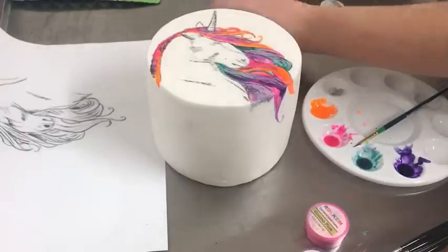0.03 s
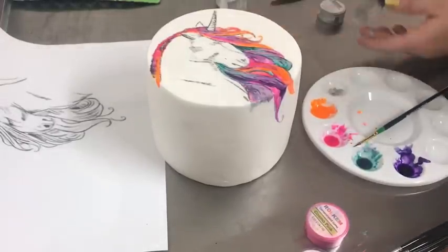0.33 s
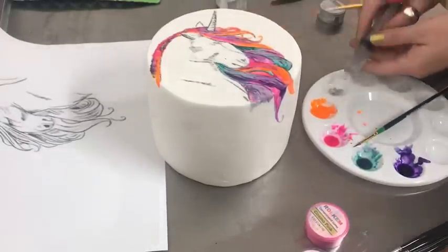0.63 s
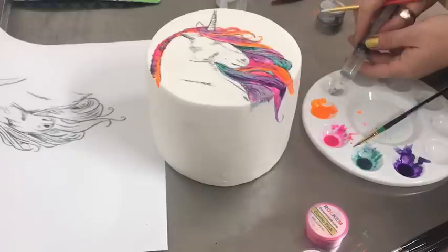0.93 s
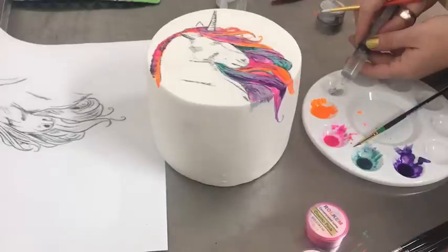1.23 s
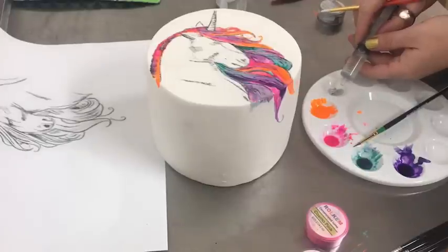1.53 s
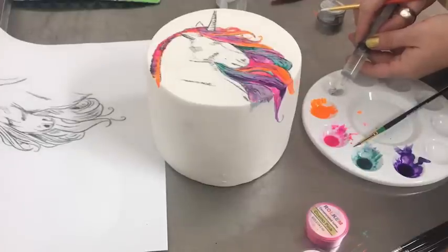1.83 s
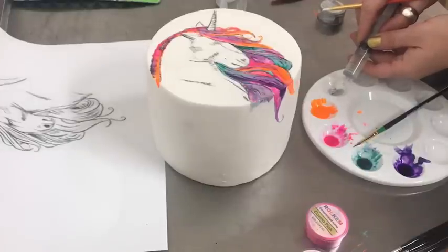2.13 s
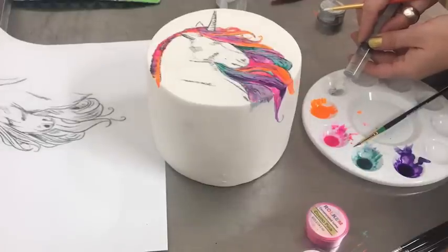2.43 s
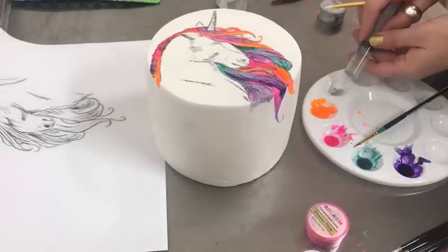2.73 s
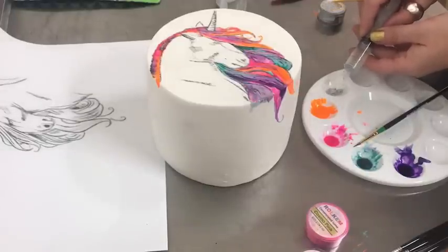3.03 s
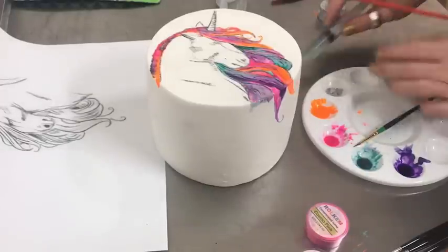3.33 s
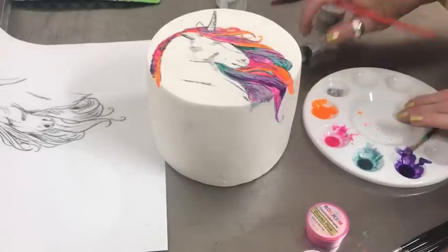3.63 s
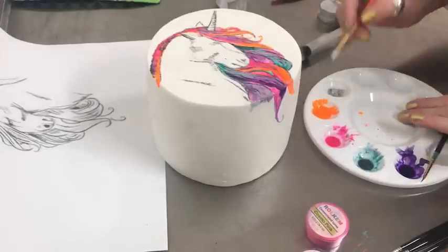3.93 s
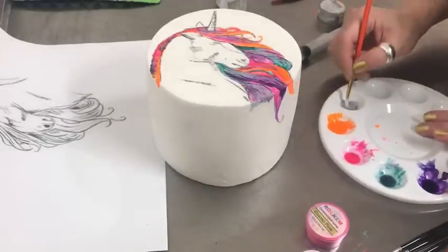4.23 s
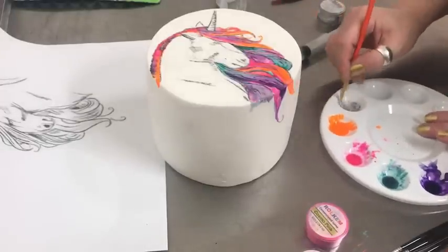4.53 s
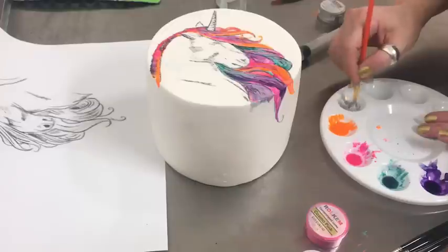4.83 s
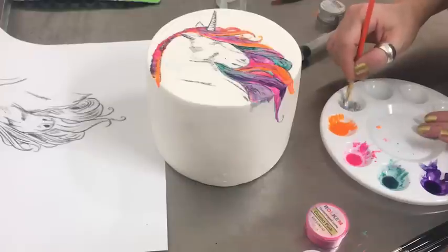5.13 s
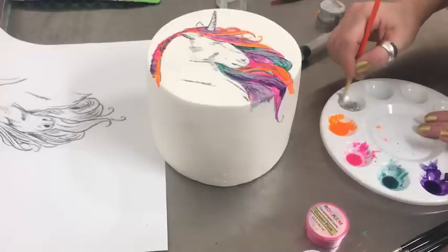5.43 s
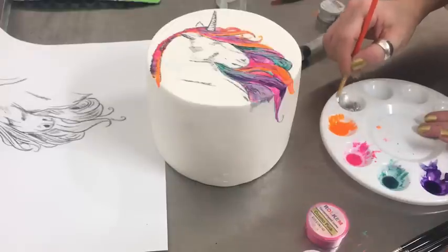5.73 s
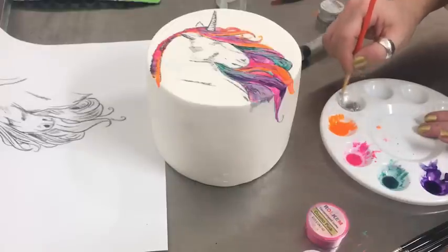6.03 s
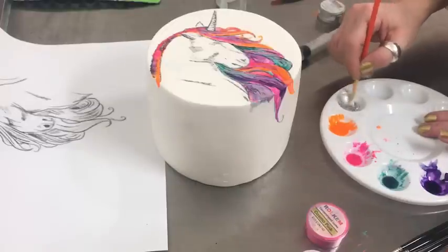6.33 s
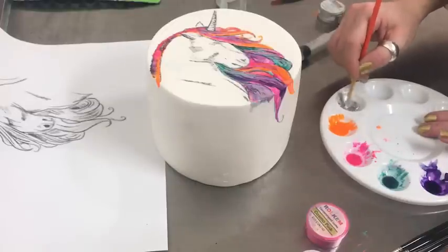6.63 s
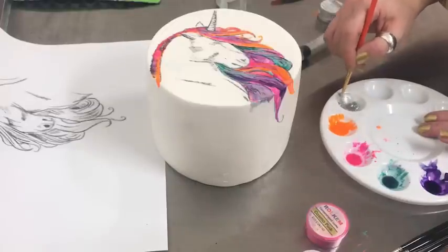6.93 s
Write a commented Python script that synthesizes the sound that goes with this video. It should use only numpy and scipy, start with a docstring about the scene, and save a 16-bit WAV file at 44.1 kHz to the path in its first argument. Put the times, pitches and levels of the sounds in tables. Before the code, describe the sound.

Things knock on a table, then a paintbrush clatters on a plastic palette and softly stirs and taps in a quiet room.

```python
"""Painter at a table

Close up in a small quiet room, things knock down on a table and a brush handle clatters on a plastic
palette. The palette slides, a sleeve swishes, and the brush stirs and taps in one of the wells.
Blows ring each object's resonances; rubbing is a stream of tiny slips. Behind it all, a wall clock
ticks faintly over the room tone and a thin electronic buzz."""
import sys
import numpy as np
from scipy import signal
from scipy.fft import rfft, irfft
from scipy.io import wavfile
from scipy.ndimage import uniform_filter1d

SR = 44100
rng = np.random.default_rng(int(sys.argv[2]) if len(sys.argv) > 2 else 0)


def persist_wave(psi):
    """Save psi, clipped to +-1, as 16-bit WAV."""
    counts = np.round(np.clip(psi, -1, 1) * 32767).astype(np.int16)
    wavfile.write(sys.argv[1], SR, np.atleast_2d(counts).T)


N = 308347
RING_SAMPLES = 32768  # buffer for one hit or one room response

# things landing on the table: (t/s, level/dB, thud/dB, crack/dB, favoured resonance/Hz)
KNOCK_HITS = [(0.001, -27, 11.5, 11.5, 844), (0.0102, -35, 21, 0, 920), (0.1305, -34.5, 11.5, 10, 403),
              (0.157, -34, 5.5, 14.5, 1790), (0.1688, -31.5, 12.5, -1, 298), (1.64, -72, 8, -17, 706),
              (1.755, -66, 13, -24, 1500), (3.512, -29, 0.5, 3, 1730), (3.5205, -34, 2, -16, 1050),
              (3.578, -39, -24.5, -10, 2070), (3.628, -28.5, 0.5, 1.5, 2150), (3.635, -34, 7, -5.5, 1350),
              (3.778, -44.5, -2, -11, 1500), (3.812, -47.5, 0, -11, 346)]
# the table's broad tone (f/Hz, gain/dB) and its modes (f/Hz, width/Hz, boost/dB)
TABLE_COLOUR = [(35, -19.5), (65, -5.5), (120, -5.5), (155, -6.5), (200, -2.5), (350, -2.5), (700, -2.5),
                (1100, -1), (1700, -1.5), (2400, -5.5), (4200, -8), (5200, -14.5), (8000, -20),
                (10500, -23.5), (13500, -23.5), (16000, -32.5)]
TABLE_MODES = [(192, 14, 8), (233, 14, 11), (356, 32, 11), (609, 18, 10), (838, 25, 7), (1096, 24, 8),
               (1249, 16, 8), (1384, 22, 5), (1496, 25, 7), (1662, 26, 8), (1826, 16, 10), (2042, 18, 8),
               (2171, 25, 7), (2535, 16, 7), (2673, 28, 7), (2960, 35, 6), (3400, 60, 4), (4145, 30, 6)]


def table_knocks():
    """Things are set down and ring the table top: low, roomy knocks."""
    return blows(KNOCK_HITS, TABLE_COLOUR, TABLE_MODES, contact_s=0.003, room_db=5,
                 thud_hz=110.2, thud_octaves=2.3, crack_hz=4750, spot_db=9.5, spot_width=0.072)


# the handle's hits and bounces: (t/s, level/dB, thud/dB, crack/dB, favoured resonance/Hz)
HANDLE_HITS = [(3.5805, -38.5, 9, -2, 2080), (3.5825, -36, 11, 7, 2040), (3.7693, -30, -8, -2, 3174),
               (3.7942, -51.5, 0.5, 15, 8170), (3.814, -49.5, 4.5, 2.5, 1480), (3.8232, -45, 0, -8, 2270),
               (3.8375, -48, 15, -11, 3230)]
# the handle's broad tone (f/Hz, gain/dB) and its modes (f/Hz, width/Hz, boost/dB)
HANDLE_COLOUR = [(60, -26), (350, -18.5), (750, -26), (1400, -0.5), (1800, -13.5), (2700, -10.5),
                 (3100, -7), (3700, -1), (4400, -9), (5100, -21), (5900, -6), (7000, -13), (8300, -14),
                 (15000, -24)]
HANDLE_MODES = [(1530, 55, 6.2), (2166, 117, 21), (2253, 52, 5.1), (3090, 100, 1.87), (3670, 160, 1.78),
                (5700, 400, 5.6), (14200, 500, 6)]


def handle_clatter():
    """A brush handle bounces on the palette: short contacts, bright clicks."""
    return blows(HANDLE_HITS, HANDLE_COLOUR, HANDLE_MODES, contact_s=0.00109, room_db=-5,
                 thud_hz=353, thud_octaves=1.3, crack_hz=5930, spot_db=14, spot_width=0.15)


# taps in a well, the last row the palette rocking on the table after the final tap: (t/s, level/dB, thud/dB,
# crack/dB, favoured resonance/Hz)
TAP_HITS = [(3.973, -61, -3, -20, 3100), (4.333, -53.5, 0, -19, 1500), (4.572, -70.5, -3, -10, 3200),
            (4.659, -60.5, -11, 0, 3100), (5.2727, -51.5, 13.5, 6.5, 2520), (5.479, -73.5, 5, 1, 3030),
            (6.261, -62, 22, 0, 3900), (6.6095, -56, 11, -1, 3080), (6.9275, -44, 3.5, 0, 3030),
            (6.934, -44.5, 6, -37, 1480)]
# the palette's broad tone (f/Hz, gain/dB) and its modes (f/Hz, width/Hz, boost/dB)
PALETTE_COLOUR = [(50, -3), (180, 5), (300, -4), (700, -14), (1400, -8), (2200, 2.5), (2600, -1),
                  (3100, 1.5), (4300, 0.5), (5000, -12.5), (5900, -12.5), (8000, -12), (10500, -18),
                  (16000, -25)]
PALETTE_MODES = [(1286, 35, 15.4), (1500, 39, 18.3), (2300, 72, 3.8), (2970, 83, 3.5), (3940, 120, 5.8),
                 (4200, 110, 2.3), (5750, 280, 13.4)]


def brush_taps():
    """The brush taps the wall of a well and lightly rings the plastic."""
    return blows(TAP_HITS, PALETTE_COLOUR, PALETTE_MODES, contact_s=0.00173, room_db=-3,
                 thud_hz=202, thud_octaves=1.3, crack_hz=2780, spot_db=5.5, spot_width=0.062)


def blows(hits, colour, modes, contact_s, room_db, thud_hz, thud_octaves, crack_hz, spot_db, spot_width):
    """Each blow rings the object; a heavy one adds low thud, a hard one adds high crack."""
    out = np.zeros(N + RING_SAMPLES)
    t, hz = np.arange(RING_SAMPLES) / SR, bins(RING_SAMPLES)
    thud_band = np.exp(-(np.log2(hz / thud_hz) / thud_octaves) ** 2)
    crack_shelf = 1 / (1 + (crack_hz / hz) ** 4)
    for at_s, db, thud_db, crack_db, spot_hz in hits:
        force = undb(thud_db * thud_band + crack_db * crack_shelf)
        # the struck spot favours one resonance
        gain = body(colour, [*modes, (spot_hz, spot_width * spot_hz, spot_db)], hz)
        # the surfaces chatter while they touch, smearing the attack
        chatter = rfft(rng.standard_normal(RING_SAMPLES) * np.exp(-(t / contact_s) ** 4))
        chatter /= np.abs(chatter)
        hit = irfft(ring(gain * force) * chatter * room(room_db))[:RING_SAMPLES // 2]
        rms = np.sqrt(np.sum(hit ** 2) / (0.02 * SR))  # as if its energy were spread over 20 ms
        start = int(at_s * SR)
        out[start:start + len(hit)] += undb(db) * hit / rms
    return out[:N]


# a nudge, then the slide: (peak t/s, level/dB, rise/s, fall/s), and their tone (f/Hz, gain/dB)
SLIDE_STROKES = [(3.94, -66.5, .09, 0.032), (4.2, -54, 0.16, 0.16)]
SLIDE_COLOUR = [(200, -17), (360, -3.5), (520, -17), (850, -14), (1150, -3.5), (2150, -2.5), (2650, -9),
                (3150, -2), (4200, -9), (5200, -19), (6100, -16), (10400, -25), (13000, -18),
                (16000, -21.5)]


def palette_slide(hiss_hz=4800):
    """The palette scrapes along the table: it grumbles when slow and gains hiss with speed."""
    scrape = coloured(grains(per_s=9000, uneven_db=1.1, room_db=3), SLIDE_COLOUR)
    hiss = signal.sosfiltfilt(signal.butter(2, hiss_hz, "high", fs=SR, output="sos"), scrape)
    speed = swells(SLIDE_STROKES)
    dullness = 1 - np.sqrt(speed / speed.max())
    return (scrape - dullness * hiss) * speed


# passes of the arm: (peak t/s, level/dB, rise/s, fall/s), and their tone (f/Hz, gain/dB)
SWISH_STROKES = [(0.2, -52, .02, 0.039), (0.37, -64, 0.14, 0.074), (0.7, -71.5, 0.5, 0.23),
                 (3.24, -76, .1, .1), (3.41, -60, 0.08, 0.091)]
SWISH_COLOUR = [(300, -23), (700, -6), (1250, 2), (1800, -2), (4000, -6), (7000, -7.5), (10400, -11),
                (13000, -10), (16000, -15)]


def sleeve_swish():
    """Hand and sleeve brush the table: slips so dense that they blur into a swish."""
    slips = grains(per_s=14000, uneven_db=0.7, room_db=3)
    return coloured(slips, SWISH_COLOUR) * swells(SWISH_STROKES)


# the ring after the knocks, and faint later swells: (peak t/s, level/dB, rise/s, fall/s)
RING_ON_SWELLS = [(0.37, -59, 0.18, 0.19), (3.87, -60, .04, 0.16), (4.14, -70, .06, 0.064),
                  (4.37, -66.5, .03, 0.024), (4.82, -69, 0.32, 0.1)]
# that ring's broad tone (f/Hz, gain/dB) and its modes (f/Hz, width/Hz, boost or cut/dB)
RING_ON_COLOUR = [(100, -5.5), (250, -9.5), (550, -6.5), (900, -7.5), (1600, -6), (3000, -13),
                  (8000, -34.5)]
RING_ON_MODES = [(235, 23, -1), (370, 31, 7.5), (588, 74, 11), (1260, 40, -3), (1825, 66, -13)]


def table_ring_on():
    """The table top and room ring on after the knocks, with a few faint low swells later."""
    wash = grains(per_s=2500, uneven_db=1.8, room_db=2)
    return coloured(wash, RING_ON_COLOUR, RING_ON_MODES) * swells(RING_ON_SWELLS)


# a light tick of the brush: (peak t/s, level/dB, rise/s, fall/s), and its tone (f/Hz, gain/dB)
SCUFF_STROKES = [(3.247, -68, .012, .018)]
SCUFF_COLOUR = [(3000, -26), (6000, -10), (6900, 6), (7600, -8), (8400, 2), (10500, -13), (13000, -12),
                (16000, -17)]


def brush_scuff():
    """The brush gives one light tick: a dry, high scuff."""
    slips = grains(per_s=8000, uneven_db=1.2, room_db=0)
    return coloured(slips, SCUFF_COLOUR) * swells(SCUFF_STROKES)


# spells of stirring: (peak t/s, level/dB, rise/s, fall/s), and the bristles' tone (f/Hz, gain/dB)
STIR_STROKES = [(4.53, -73.5, .08, 0.26), (5.97, -73, 0.61, 0.46)]
STIR_COLOUR = [(300, -10), (700, -11), (1100, -2), (1450, 3.5), (1900, -5.5), (3100, -2.5), (4200, -7),
               (5200, -9), (7000, -9.5), (10500, -14), (15000, -12)]


def brush_stir(turns_per_s=5.3, swing_db=0.5):
    """Bristles circle in a well with a soft rustle, pressing harder once each turn."""
    t = np.arange(N) / SR
    pressure = undb(-swing_db * np.sin(2 * np.pi * turns_per_s * t + wander(2.9)))
    rustle = coloured(grains(per_s=3000, uneven_db=2, room_db=0), STIR_COLOUR)
    return rustle * pressure * swells(STIR_STROKES)


# the hand's weight on the table: (peak t/s, level/dB, rise/s, fall/s)
LEAN_SWELLS = [(4.65, -67, .25, .3), (6.35, -62.5, 0.4, 0.46)]


def table_rumble():
    """The working hand faintly shakes the table: swells of low noise."""
    # (f/Hz, gain/dB)
    colour = [(40, -23), (70, -4), (100, 3), (135, -7.5), (190, 0), (300, -17.5), (1000, -42)]
    return coloured(rng.standard_normal(N), colour) * swells(LEAN_SWELLS)


def grains(per_s, uneven_db, room_db):
    """Dense tiny impulses of unequal size and wavering level, smeared by the room."""
    impulses = (rng.random(N) < per_s / SR) * rng.standard_normal(N)
    waver = undb(uneven_db * wander(45))
    return signal.fftconvolve(impulses * waver, irfft(room(room_db)))[:N]


def swells(rows, roundness=1.88):
    """Envelope of swells that rise to a peak and ease off; roundness 1 is pointed, 2 a bell."""
    t, gain = np.arange(N) / SR, 0
    for peak_s, db, rise_s, fall_s in rows:
        away = np.abs(t - peak_s) / np.where(t < peak_s, rise_s, fall_s)
        gain = gain + undb(db) * np.exp(-away ** roundness)
    return gain


# the gears' broad tone (f/Hz, gain/dB) and their modes (f/Hz, width/Hz, boost or cut/dB)
GEAR_COLOUR = [(300, -8), (650, -7.5), (1100, 6.5), (1700, -1), (3300, 1), (4800, -10), (6200, -11.5),
               (12000, -23)]
GEAR_MODES = [(1027, 36, 12.5), (2070, 60, -4), (2470, 65, 5), (3420, 140, 0), (6160, 270, 9)]


def wall_clock(first_s=0.099, every_s=1, rise_s=0.031, fall_s=0.029, tail_s=0.19, tail_db=-12,
               gears_db=-66, quiver_db=-72.5, quiver_db_per_s=-0.5, quivers_per_s=15.6, quiver_s=0.19):
    """A far clock steps on: a short swelling rattle of gears, then its hand quivers to rest."""
    gears = coloured(rng.standard_normal(N), GEAR_COLOUR, GEAR_MODES)
    hand_colour = [(500, -22), (1000, 3), (3300, -7), (8000, -36)]  # (f/Hz, gain/dB)
    hand = coloured(rng.standard_normal(N), hand_colour, modes=[(3320, 130, 18)])
    t = np.arange(N) / SR
    from_tick = (t - first_s + every_s / 2) % every_s - every_s / 2  # negative before the nearest tick
    swell = np.exp(np.minimum(from_tick, 0) / rise_s)
    after = np.maximum(from_tick, 0)
    step = np.exp(-after / fall_s) + undb(tail_db) * np.exp(-after / tail_s)
    quiver = np.exp(-(after / quiver_s) ** 2) * np.cos(np.pi * quivers_per_s * from_tick) ** 2
    quiver *= undb(quiver_db + quiver_db_per_s * t)  # weaker as the hand moves round the dial
    return swell * (undb(gears_db) * step * gears + quiver * hand)


# the tone of the room's air: (f/Hz, gain/dB)
AIR_COLOUR = [(18, -25), (32, -14), (48, -4.5), (120, -3), (170, -9.5), (280, -14.5), (410, -21),
              (850, -28.5), (1400, -29.5), (2000, -33.5), (2900, -35.5), (6000, -39.5), (8500, -41.5),
              (10500, -43), (14000, -41.5)]


def room_tone(air_db=-62, rumble_db=-68.5, waver_db=0.81):
    """A bed of smooth, dark hiss and the building's wavering low rumble."""
    air = coloured(rng.standard_normal(N), AIR_COLOUR)
    # (f/Hz, gain/dB)
    lows = [(25, -28), (70, 2.5), (120, -5.5), (180, -4), (300, -17.5), (600, -31.5), (3000, -54.5)]
    rumble = coloured(rng.standard_normal(N), lows, modes=[(92, 14, 6)])  # the mode adds a soft hum
    return undb(air_db) * air + undb(rumble_db + waver_db * wander(7.2)) * rumble


def electronic_buzz(pitch_hz=999.3, harmonics=15, fundamental_db=-90.5, db_per_octave=-2):
    """A thin, steady buzz: multiples of one pitch, each octave a little weaker."""
    t, buzz = np.arange(N) / SR, 0
    for k, phase in enumerate(rng.random(harmonics), 1):
        peak = np.sqrt(2) * undb(fundamental_db + db_per_octave * np.log2(k))
        buzz = buzz + peak * np.sin(2 * np.pi * (k * pitch_hz * t + phase))
    return buzz


# the small room's reverb time: (f/Hz, T60/s)
ROOM_DECAY = [(150, 0.2), (600, 0.22), (2000, 0.27), (4000, 0.27), (8000, 0.17), (15000, 0.15)]


def room(room_db, early_db=3, early_s=0.0058, build_s=0.0034, late_db=-27, late_t60_s=1.0):
    """Spectrum of the direct sound, a burst of table-top reflections and the room's short tail."""
    t, hz = np.arange(RING_SAMPLES) / SR, bins(RING_SAMPLES)
    scatter = np.exp(2j * np.pi * rng.random(len(hz)))
    band_hz, band_t60_s = np.transpose(ROOM_DECAY)
    fade = np.log(1000) * t  # 60 dB down after one T60
    late = undb(late_db) * np.exp(-fade / late_t60_s)
    tail = 0
    for share, t60_s in zip(np.eye(len(band_hz)), band_t60_s):
        band = irfft(scatter * np.interp(np.log(hz), np.log(band_hz), share))
        tail = tail + band * (np.exp(-fade / t60_s) + late)
    early_burst = 1 + undb(early_db) * np.exp(-t / early_s)
    build_up = 1 - np.exp(-t / build_s)
    reverb = rfft(tail * early_burst * build_up)
    # many paths share the energy evenly over any broad band
    reverb /= np.sqrt(uniform_filter1d(np.abs(reverb) ** 2, size=121))
    return 1 + undb(room_db) * reverb


def body(colour, modes, hz):
    """An object's gain at each frequency: modes shaping a broad tone curve."""
    colour_hz, colour_db = np.transpose(colour)
    broad = undb(np.interp(np.log(hz), np.log(colour_hz), colour_db))
    power = 1 + sum((undb(db) ** 2 - 1) / (1 + (2 * (hz - f) / width) ** 2) for f, width, db in modes)
    return broad * np.sqrt(np.maximum(power, 0.01))


def ring(gain):
    """Minimum-phase spectrum with this gain: a sharp attack, then modes dying away."""
    cepstrum = irfft(np.log(gain))
    cepstrum[1:RING_SAMPLES // 2] *= 2
    cepstrum[RING_SAMPLES // 2 + 1:] = 0
    return np.exp(rfft(cepstrum))


def coloured(excitation, colour, modes=()):
    """A long excitation heard through an object, at rms 1."""
    sound = irfft(rfft(excitation) * body(colour, modes, bins(N)), N)
    return sound / np.sqrt(np.mean(sound ** 2))


def wander(knots_per_s):
    """Random drift with a spread near 1."""
    knots = rng.standard_normal(2048)
    return np.interp(np.arange(N) / SR * knots_per_s, np.arange(len(knots)), knots)


def bins(samples):
    """Frequencies of a spectrum, floored at 1 Hz."""
    return np.maximum(np.fft.rfftfreq(samples, 1 / SR), 1)


def undb(db):
    """Decibels to gain."""
    return 10 ** (np.asarray(db) / 20)


def scene():
    """The mono mix: the painter's hits and soft textures in front, the room behind."""
    hits = table_knocks() + handle_clatter() + brush_taps()
    textures = palette_slide() + sleeve_swish() + table_ring_on() + brush_scuff()
    stirring = brush_stir() + table_rumble()
    background = wall_clock() + room_tone() + electronic_buzz()
    return (hits + textures + stirring + background)[None]


def record(dry):
    """A steep low-pass cuts the top above 15.9 kHz."""
    return signal.sosfilt(signal.ellip(10, 0.2, 70, 15900, fs=SR, output="sos"), dry)


dry = scene()
out = record(dry)
persist_wave(out)
```